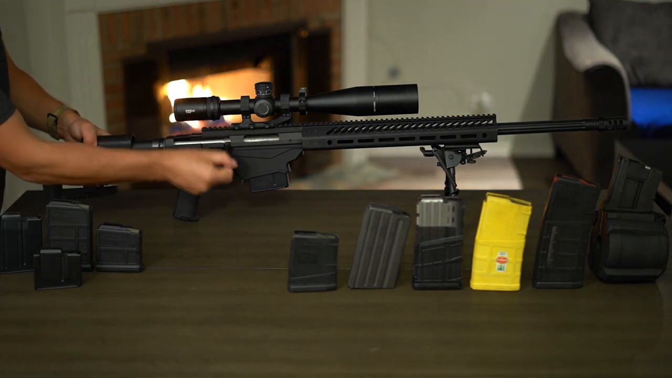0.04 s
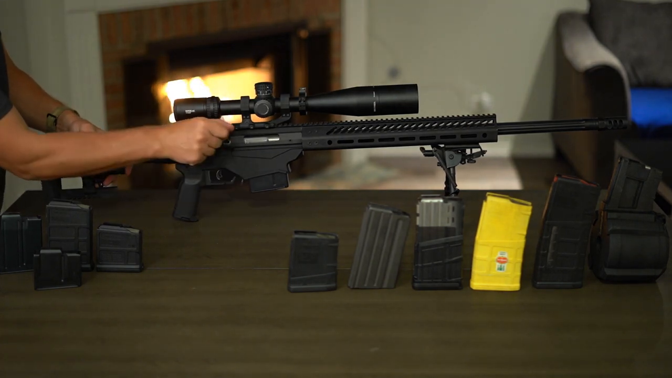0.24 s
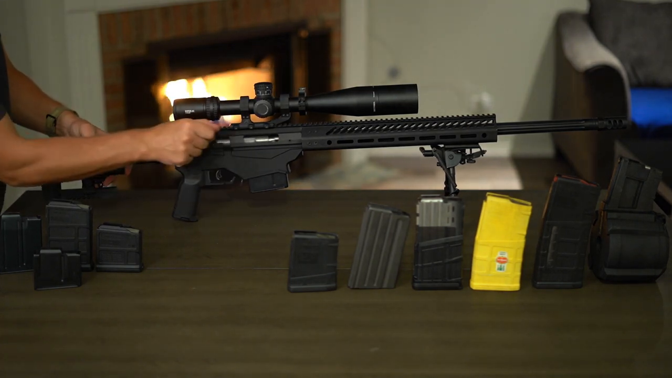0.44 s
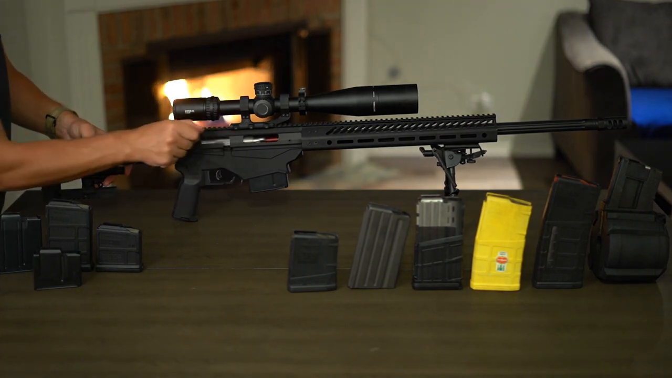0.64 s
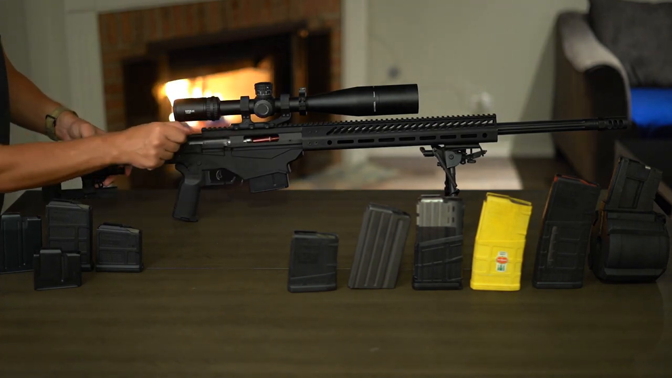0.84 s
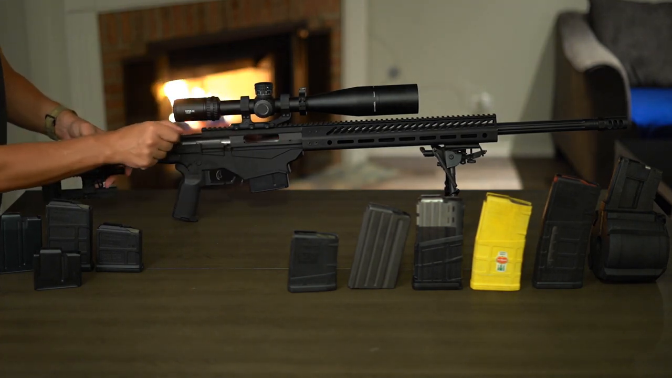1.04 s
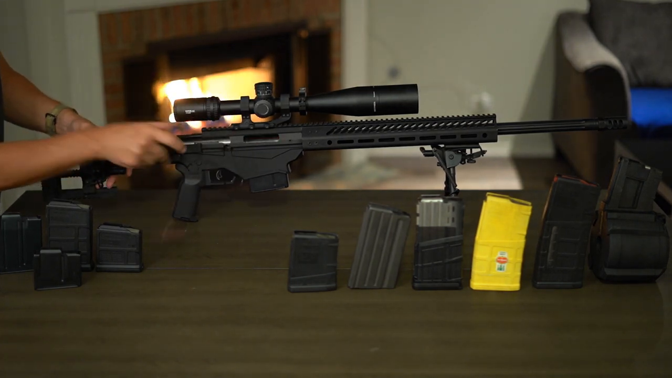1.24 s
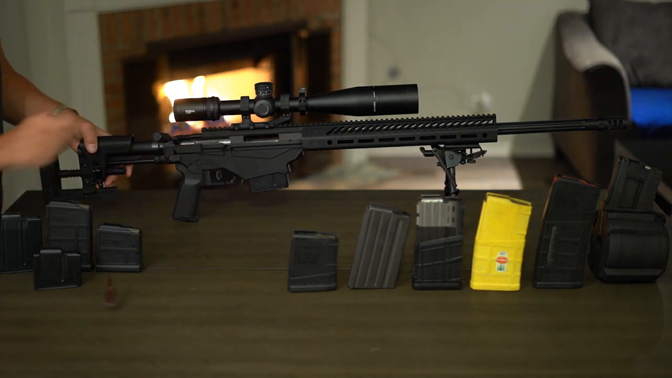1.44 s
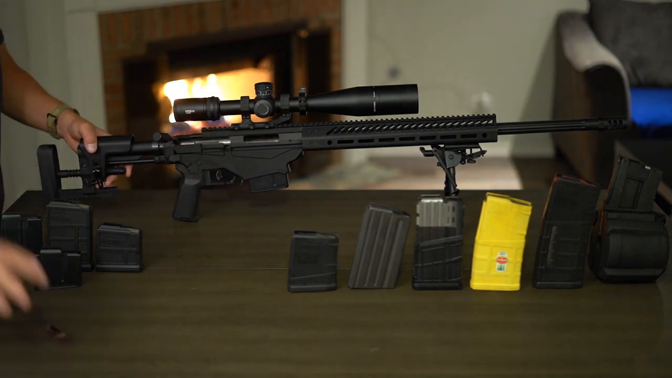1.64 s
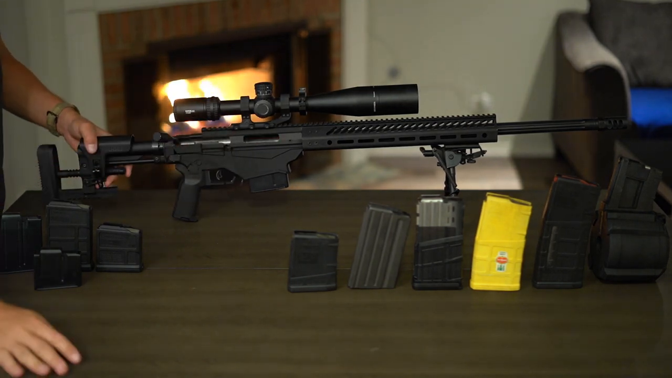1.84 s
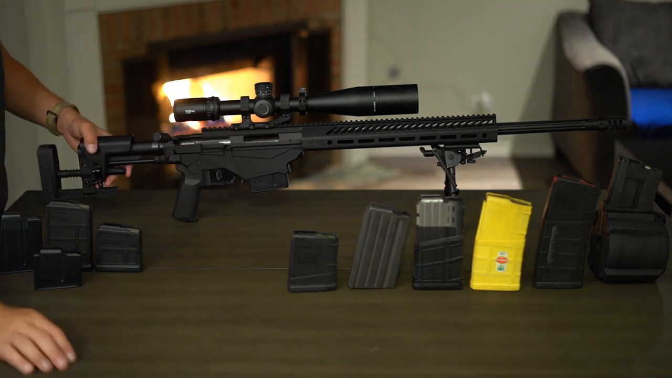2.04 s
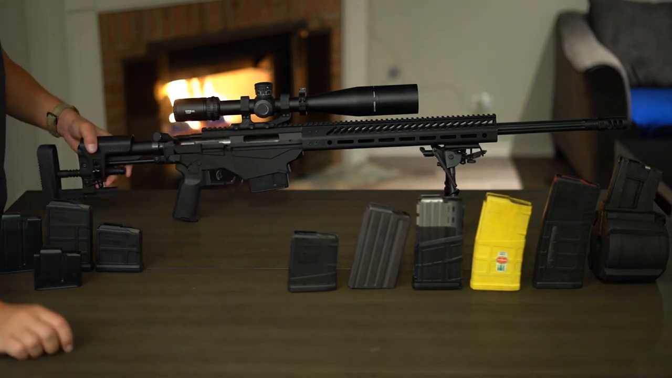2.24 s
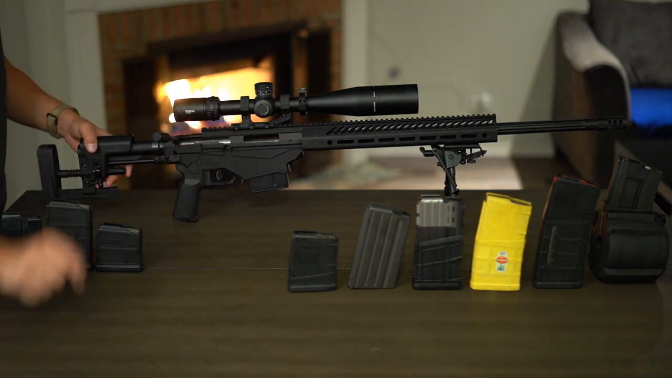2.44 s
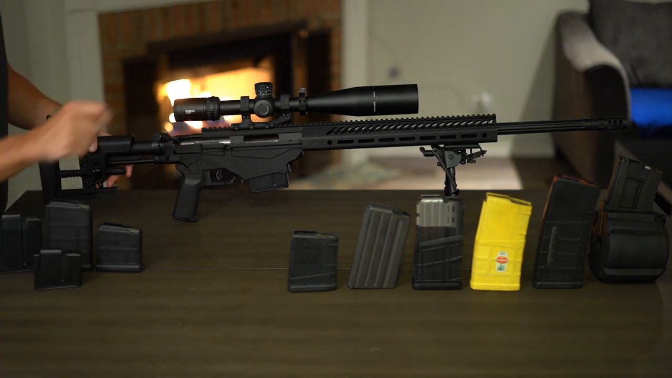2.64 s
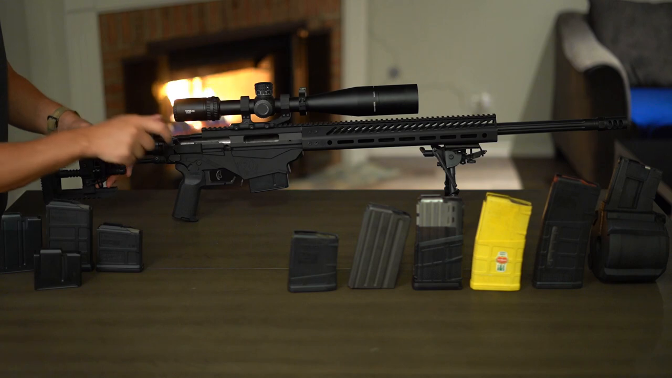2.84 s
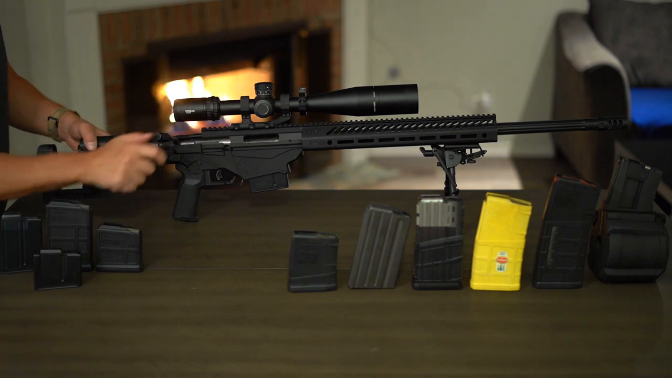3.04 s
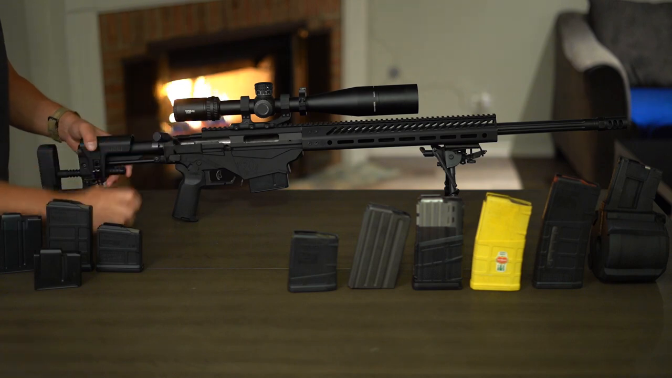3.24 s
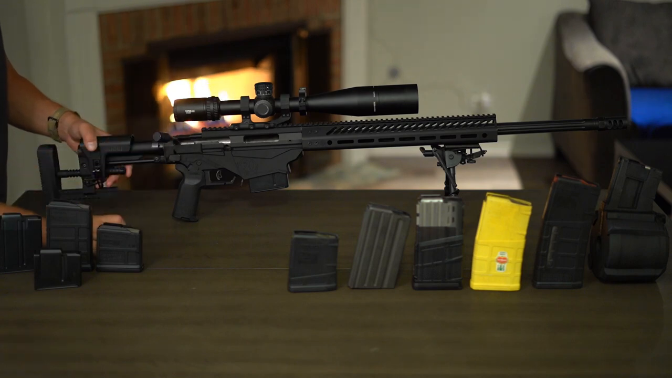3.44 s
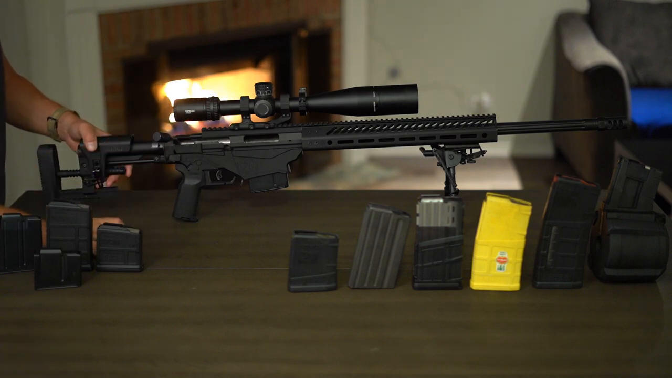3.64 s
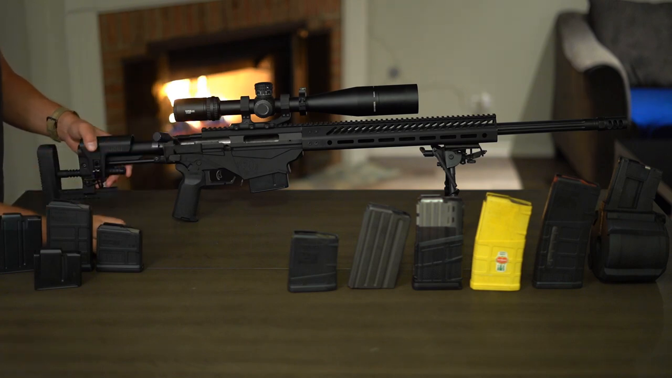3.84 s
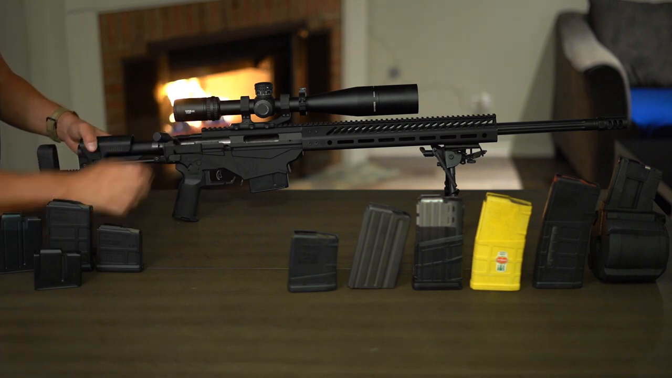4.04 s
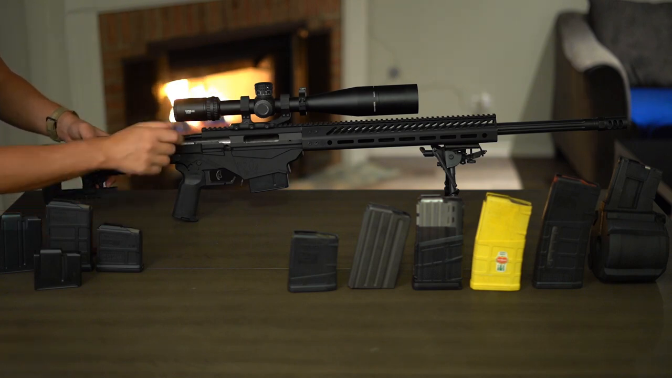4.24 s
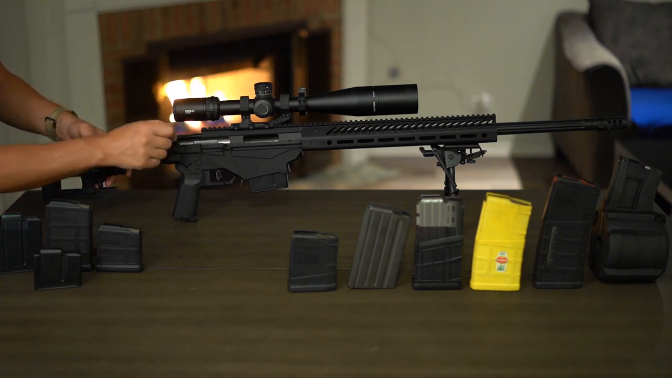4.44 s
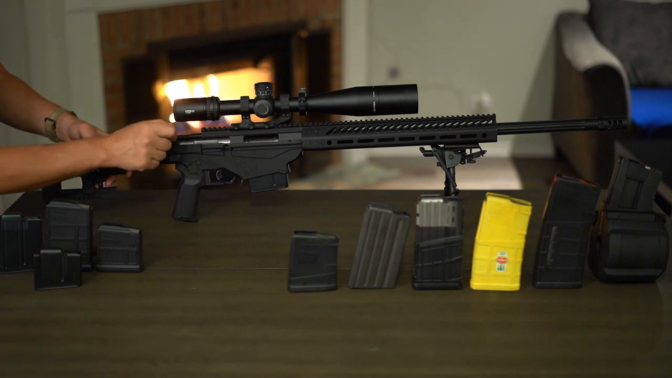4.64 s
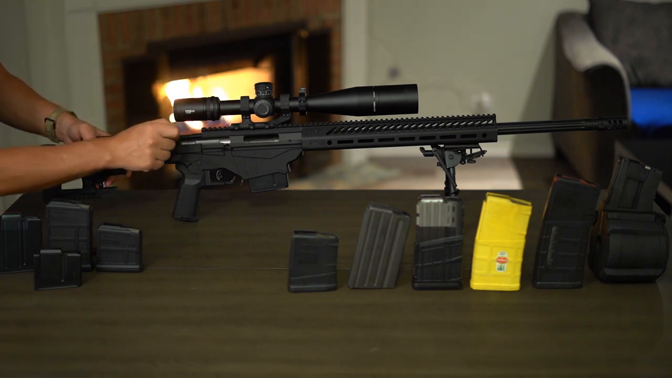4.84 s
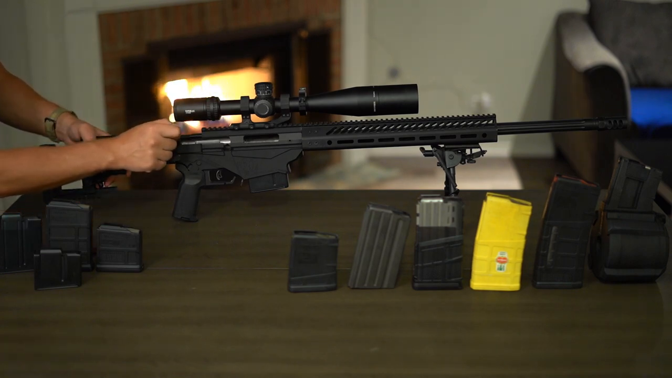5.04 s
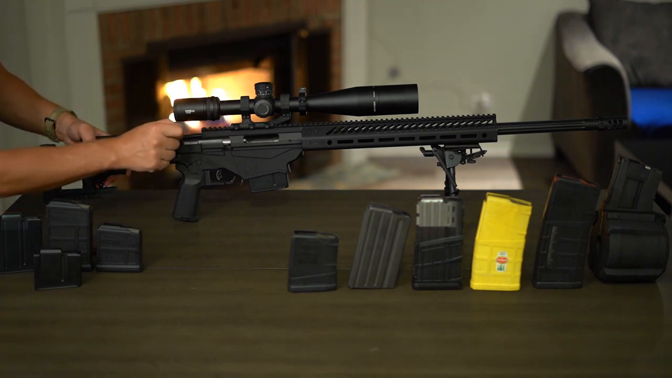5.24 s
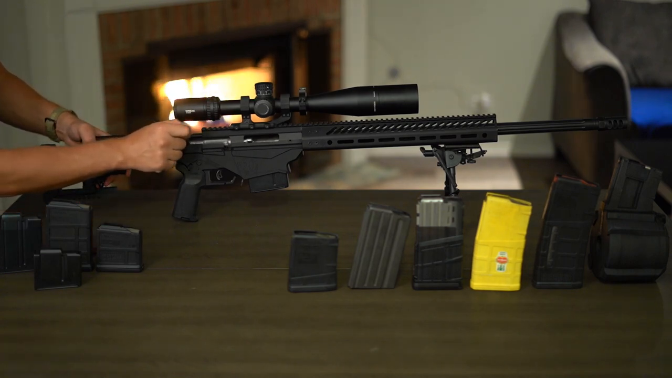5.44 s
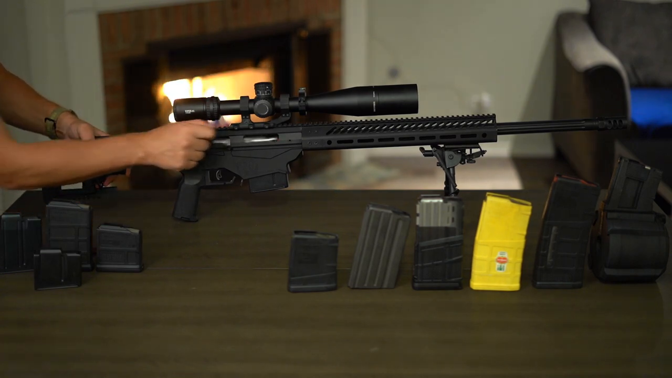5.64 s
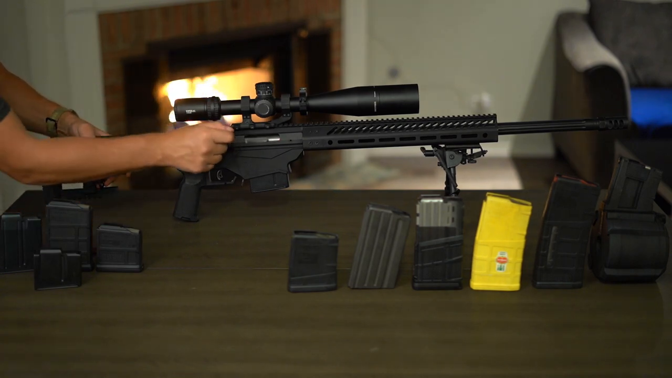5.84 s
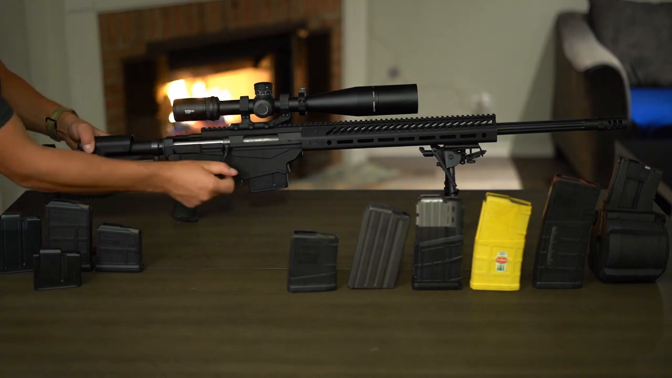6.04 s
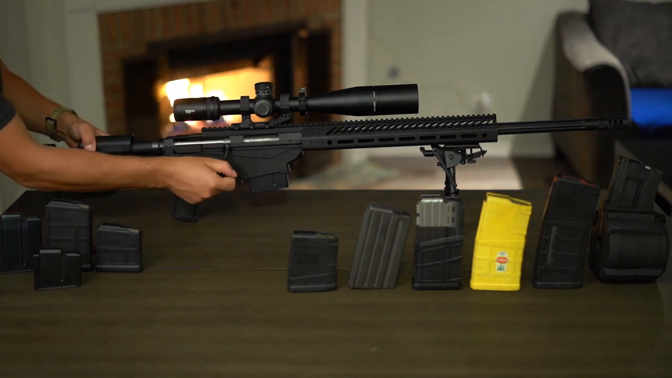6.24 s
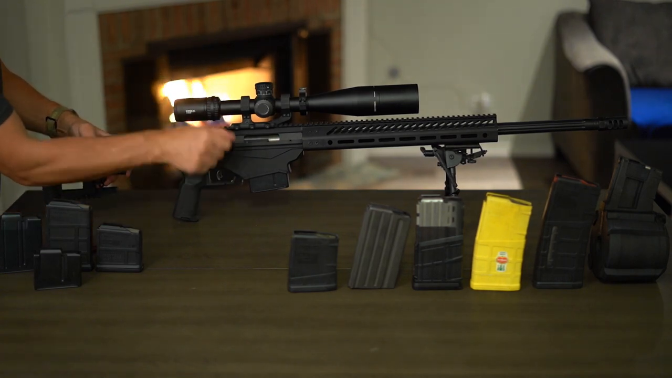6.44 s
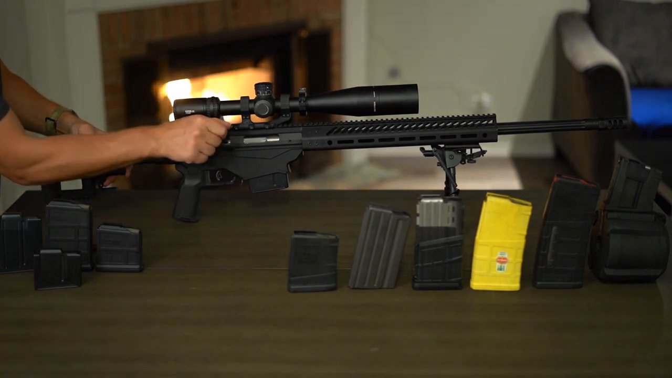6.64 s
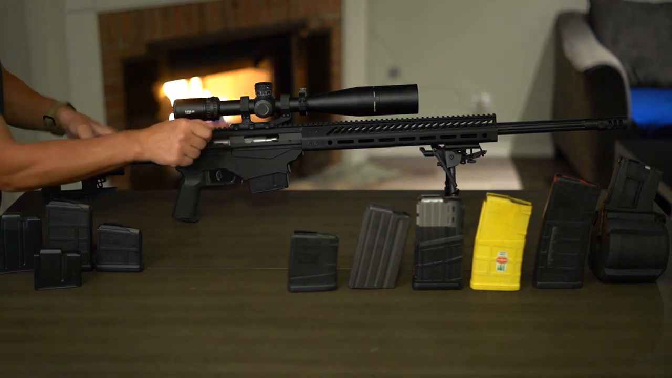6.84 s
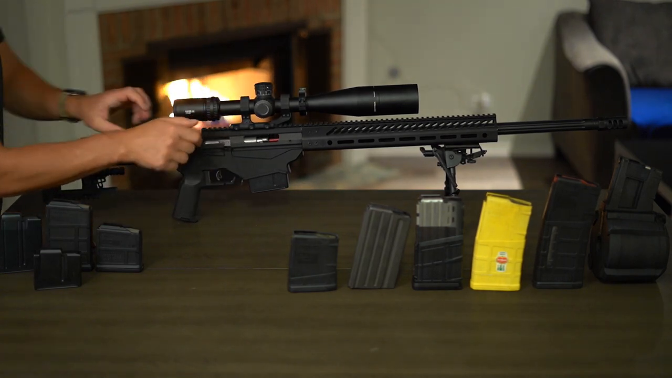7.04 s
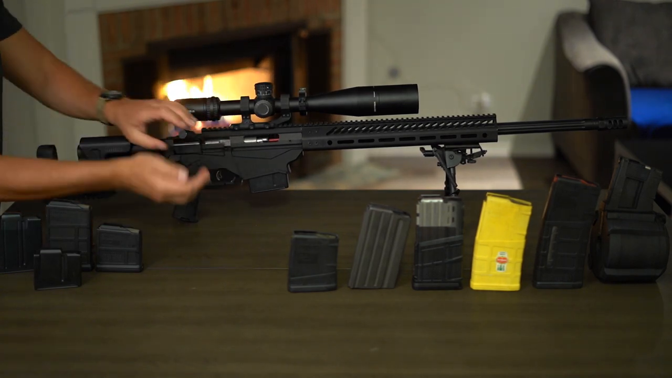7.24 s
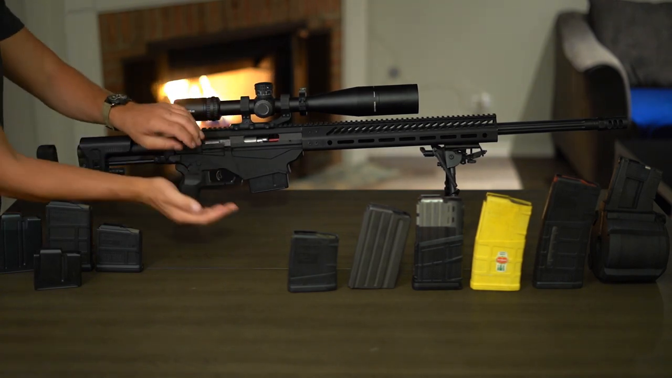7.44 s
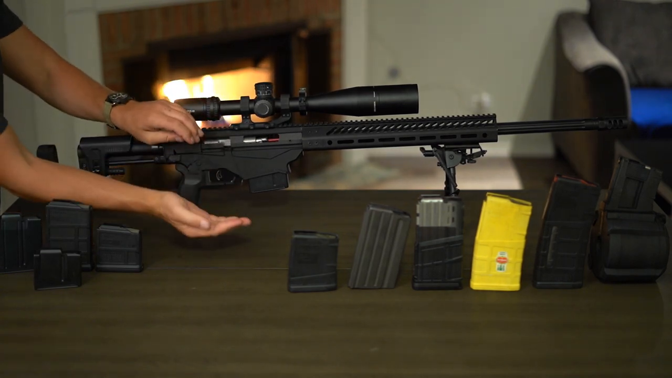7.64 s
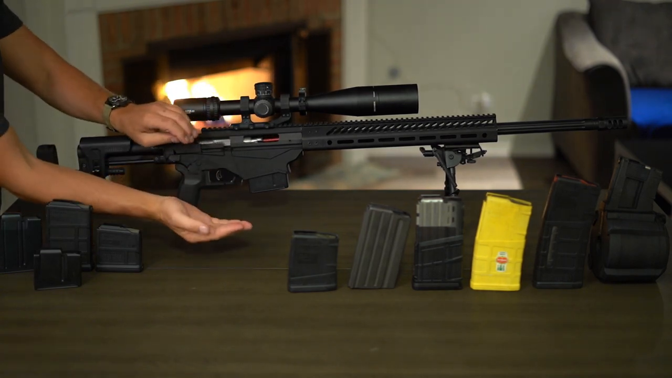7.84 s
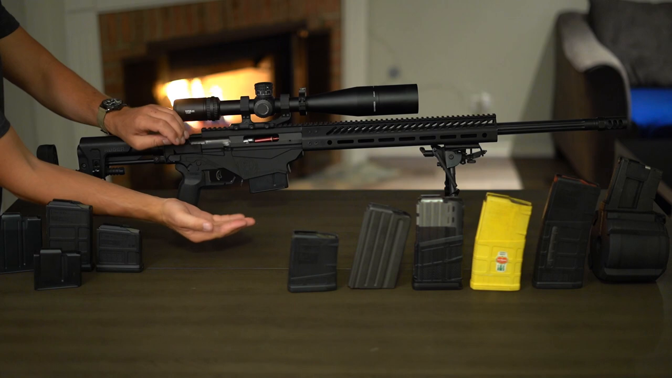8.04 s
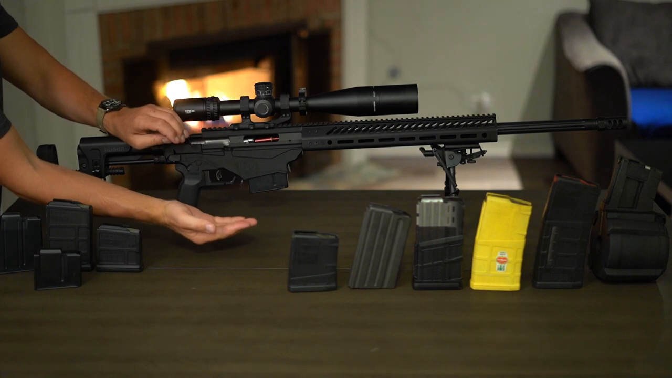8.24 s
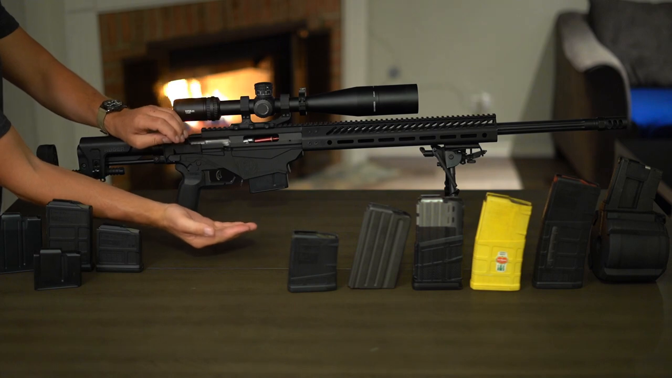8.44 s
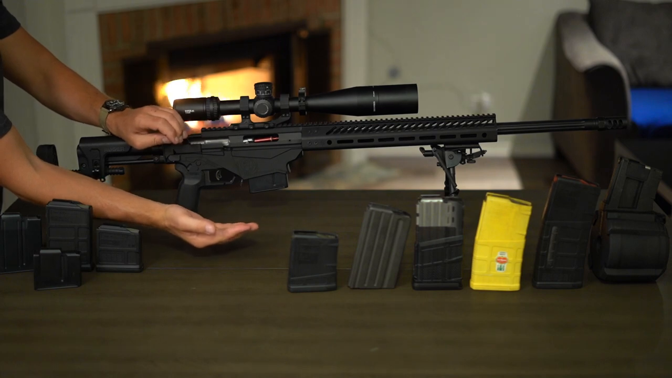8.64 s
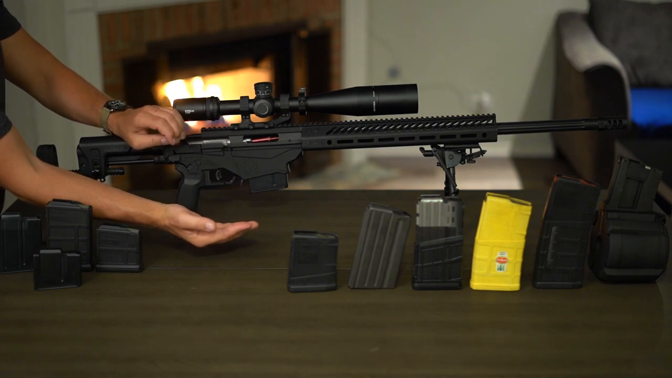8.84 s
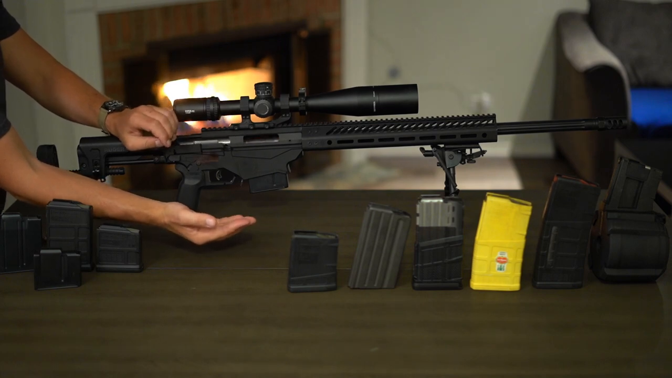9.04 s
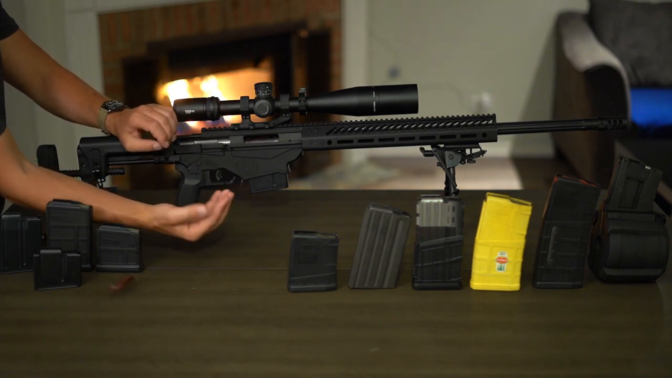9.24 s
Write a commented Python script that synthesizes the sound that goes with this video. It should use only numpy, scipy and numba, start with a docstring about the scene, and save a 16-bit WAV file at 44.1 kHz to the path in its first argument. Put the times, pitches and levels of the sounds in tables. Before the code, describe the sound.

A bolt-action rifle is worked twice on a table, near the microphone in a reverberant room with a low hum. Steel clacks and a short scrape send a ringing brass case clattering over the hard surface. One dry firing pin snap follows, then the bolt slams home and locks, thumping the table. It opens again amid soft handling knocks, and another case ejects with a high ping and a quick clack.

```python
"""A bolt-action rifle is cycled twice on a table, close to one microphone in an echoing living room.
Its steel bolt lifts, slides and slams, ringing the rifle and thumping the table; the firing pin snaps once.
Two ejected brass cases ring and tumble, and the first clatters on a hard surface.
A limiter squeezes the loudest blows. Under it all lies a low room rumble with a hum."""
import sys
import numpy as np
from scipy import signal
from scipy.fft import rfft, irfft, next_fast_len
from scipy.io import wavfile
from numba import njit

SR = 44100
rng = np.random.default_rng(int(sys.argv[2]) if len(sys.argv) > 2 else 0)


def store_wav(level_fs):
    """Save 16-bit WAV to argv[1]."""
    pcm = np.round(np.clip(np.atleast_2d(level_fs), -1, 1) * 32767)
    wavfile.write(sys.argv[1], SR, pcm.T.astype(np.int16))


N = 410571
SNAP_S = 4.3705  # when the firing pin snaps


def rifle_hits(knock_hz=1524, knock_room_db=0.5, pin_db=-10.5, pin_hz=2930, pin_room_db=-6):
    """Hits ring the rifle's steel: square ones are brighter than glancing ones, near-side ones drier."""
    # Four kinds of hit, each with the columns
    # (time [s], strength [dB], brightness [dB per octave], pitch of struck part [Hz], room share [dB])
    clacks = [(.161, -11.5, 0, 3560, 2), (.172, -7.5, 0, 3230, -14), (.184, -17, 2.5, 3390, 3),
              (.252, -10.5, 1, 3400, 2), (1.14, -12, 0, 2170, -1.5), (5.985, -16, -2.5, 3300, 6),
              (5.999, -1.5, 0.5, 3550, 2.5), (6.047, -7, 0.5, 4150, 4.5), (6.075, -9.5, -3.5, 790, -5),
              (6.454, -9, -1, 3460, 1), (6.465, -13, 1, 4130, -3), (6.555, -9, 1, 1495, 3.5),
              (6.93, -18.5, -4, 1980, -6)]  # the bolt handle lifts, drops and locks
    stops = [(.754, -9.5, 0, 4050, 0.496), (5.788, -8, 0, 4140, 0.82), (7.94, -11.5, 0, 5400, 3.5)]  # the bolt hits either end of its travel
    catches = [(1.056, -16.5, -1.8, 2454, -2.5), (1.083, -17, -4.3, 3960, -6),
               (4.889, -26, -2.8, 3350, -3.5), (5.591, -21.5, -0.5, 2770, 1.5), (5.63, 5, 2.4, 2700, 0),
               (5.676, -9.5, 0.34, 2760, 6), (8.951, -13, 0.12, 4300, 0.5), (8.983, -12, 1, 2980, -17),
               (9.017, -10, -0.46, 2210, 1)]  # bolt face, extractor and ejector catch a cartridge
    clinks = [(1.09, -17.5, 0.5, 3570, -1.5), (1.353, -2, 7, 3500, -17.5), (1.361, -8, 4, 3500, -12),
              (5.708, -12, -1, 3370, 4.5), (8.995, -20.5, -2, 3800, 6)]  # the mouth of a case strikes something hard
    # hands and loose parts knock the rifle: (time [s], strength [dB], brightness [dB per octave])
    knocks = [(.084, -36.5, 2), (.229, -14.5, 1.5), (.449, -24.5, 6.5), (0.609, -33, 12),
              (1.257, -25.5, -0.5), (5.055, -42.5, 5), (5.115, -32.5, -1), (6.437, -31.5, 2),
              (6.507, -23, 4), (6.753, -30, 9), (6.81, -25.5, -2), (6.945, -22, 6.5), (7.067, -30, -1.5),
              (7.492, -27.5, -1), (7.634, -23, 0), (7.788, -31, 0), (8.494, -36.5, -2.5)]
    # the tone of each kind of hit: (level [dB]) at each of the six bass-to-treble points in blows()
    clack_colour = [-8.5, -8, 0, -1, -10, -23]
    stop_colour = [-11, -11, -2, -1, -4, -8.5]
    catch_colour = [-25, -18, -8, -3, -19, -24.5]
    clink_colour = [-4.5, -4, -1, -5.5, 11.5, -3.5]
    knock_colour = [3.5, 6, 6, 0.5, -19, -34.5]
    snap_colour = [-4.5, 3, 1.5, -1.5, -9.5, -27]
    # peaks and dips in the rifle's ring: (pitch [Hz], width [Hz], boost [dB])
    resonances = [(457, 140, 10.5), (790, 240, 3), (1474, 44.5, -1), (2830, 202, 1), (3200, 480, 2),
                  (4160, 2500, 4.5), (5270, 430, 1.5), (6260, 160, 3), (7620, 50, -3.5), (7700, 210, 3.5),
                  (9340, 250, 3.5), (10200, 155, 3.5), (14170, 213, -5)]
    kinds = [(clacks, clack_colour), (stops, stop_colour),
             (catches, catch_colour), (clinks, clink_colour),
             ([(*row, knock_hz, knock_room_db) for row in knocks], knock_colour),
             ([(SNAP_S, pin_db, 0, pin_hz, pin_room_db)], snap_colour)]
    return sum(blows(hits, colour, resonances, contact_s=0.0056, part_share=0.72, part_width=0.086,
                     extra_room_db=-0.1, ripple_db=2.5) for hits, colour in kinds)


def bolt_slides(swell_db=16, grain_db=4, catches_per_s=260, treble_hz=5000):
    """Steel catches and slips on steel; pressing a cartridge along makes it brighter."""
    # strokes of the bolt: (hardest push [s], swell [s], let-off [s], level [dB], treble share [dB])
    strokes = [(.72, 0.24, 0.057, -33, -5.5), (5.41, .14, 0.021, -37, -7), (5.585, 0.12, 0.051, -29.5, -4),
               (5.71, 0.091, 0.11, -10, 4.5), (6.07, .06, 0.039, -24.5, -23), (7.91, .08, 0.065, -36.5, -9),
               (8.92, 0.076, .05, -38, -20), (8.965, 0.016, 0.026, -27.5, -14)]
    # the tone of the scraping: (frequency [Hz], relative level [dB])
    scrape_colour = [(200, -5.5), (450, -3), (1200, -5.5), (2200, -4.5), (2750, 1), (3050, -4.5),
                     (3500, 1.5), (4800, -10), (7500, -13.5), (11000, -22), (16000, -26)]
    # dry steel squeaks as it slides: (time [s], level [dB], pitch [Hz], length [s])
    squeaks = [(0.59, -36, 4660, 0.044), (0.641, -26.5, 1240, 0.018), (0.676, -30, 2780, 0.014),
               (.722, -31.5, 2880, 0.039), (5.402, -37, 2720, 0.024)]
    out = np.zeros(N)
    for s, swell, let_off, db, treble_db in strokes:
        t = np.arange(-swell, let_off, 1 / SR)
        push_db = db - swell_db * np.maximum(-t / swell, t / let_off)
        rub = shaped(rng.standard_normal(SR)[:len(t)], scrape_colour)
        rub *= amp(grain_db * drift(t + swell, catches_per_s))
        dull = signal.sosfilt(signal.butter(4, treble_hz, fs=SR, output="sos"), rub)
        bright = signal.sosfilt(signal.butter(4, treble_hz, "high", fs=SR, output="sos"), rub)
        add(out, s - swell, amp(push_db) * unit(dull + amp(treble_db) * bright))
    for s, db, hz, length in squeaks:
        t = np.arange(0, length, 1 / SR)
        cycles = np.cumsum(hz * (1 + 0.029 * drift(t, 378))) / SR
        add(out, s, amp(db) * np.sqrt(2) * np.sin(2 * np.pi * cycles) * np.hanning(len(t)))
    return out


def thumps(snap_db=-16.5):
    """The firing pin shakes the rifle's frame; pushing the bolt shakes the table through the rifle."""
    # pushes on the bolt: (time [s], strength [dB])
    pushes = [(.253, -34.5), (5.632, -24), (5.788, -26.5), (6.076, -26), (8.984, -38)]
    # natural tones of frame and table: (pitch [Hz], relative level [dB], time to fade 60 dB [s])
    frame_tones = [(322, -22, .14), (443, 1.5, 0.11), (770, -1.5, 0.094), (910, -6, 0.13),
                   (1007, -3.5, 0.08), (2840, 0, 0.0087)]
    table_tones = [(136, 5, .3), (165, 2, 0.26), (244.2, -5, 0.3), (302.4, 5.5, .25)]
    t, out = np.arange(SR // 2) / SR, np.zeros(N)
    for hits, tones in [([(SNAP_S, snap_db)], frame_tones), (pushes, table_tones)]:
        ring = sum(amp(db - 60 * t / fade_s) * np.sin(2 * np.pi * hz * t) for hz, db, fade_s in tones)
        for s, db in hits:
            add(out, s, amp(db) * ring)
    return out


def ringing_cases(split_hz=38, partner_db=-5, depth=0.61, swing=0.97, wobble=0.83):
    """A brass case's mouth rings with two close tones; tumbling swings their loudness and phase."""
    # each ring of a case: (time [s], level [dB], pitch [Hz], time to fade 60 dB [s],
    # tumbles [per s], time until it lies still [s])
    rings = [(1.089, -9.5, 10030, 0.77, 39.5, 0.31), (1.349, -1, 9990, 0.67, 9.3, 0.53),
             (1.862, -20, 10130, 0.046, 14, .05), (2.182, -24, 10050, 0.067, 14, .15),
             (3.509, -58, 10010, 0.29, 16, .15), (3.663, -47, 9650, 0.38, 14.4, 0.18),
             (5.640, -2.5, 10300, 0.28, 41, 0.099), (8.996, -2.5, 10240, 0.53, 30, 0.22)]
    t, out = np.arange(SR) / SR, np.zeros(N)
    for s, db, hz, fade_s, tumbles, still_s in rings:
        turn = 2 * np.pi * tumbles * t + drift(t, 13.56)
        phase = 2 * np.pi * hz * t + swing * np.sin(turn) + wobble * drift(t, 4 * tumbles)
        beat = np.pi * split_hz * t
        pair = np.sin(phase + beat / 2) + amp(partner_db) * np.sin(phase - 3 * beat / 2)
        damping = np.exp(-np.maximum(t - still_s, 0) / 0.027)
        add(out, s, amp(db - 60 * t / fade_s) * damping * pair * (1 - depth * np.sin(turn) ** 2))
    return out


def falling_brass(room_db=1):
    """Brass lands on a hard surface, bounces and is set down."""
    # landings: (time [s], strength [dB], brightness [dB per octave], pitch of struck part [Hz])
    drops = [(1.34, -6.5, -1.5, 2040), (1.349, 10.5, 2, 2650), (1.5, -3.5, 2, 1970), (1.592, -6, 0, 4100),
             (2.128, -8, 3.5, 1530), (2.176, -9.5, -1, 1460), (3.509, -24.5, -1, 2000),
             (3.66, -12.5, -4.5, 1510), (3.67, -13, -1.5, 1390), (3.8, -26.5, -3, 1560),
             (9.294, 1, 2.5, 3380), (9.304, -2, 3, 1120)]
    # the tone of a landing: (level [dB]) at each of the six bass-to-treble points in blows()
    colour = [-20.5, -2, 7, 1.5, -22, -36]
    # peaks in the ring of brass on the surface: (pitch [Hz], width [Hz], boost [dB])
    resonances = [(400, 230, 6.3), (694, 51, 6.1), (1240, 170, 2.9), (1500, 40, 5), (1980, 33, 1.7),
                  (3180, 75, 0.73), (3680, 530, 4.7), (10130, 310, 14)]
    hits = [(*row, room_db) for row in [*drops, *rattle(), *settling()]]
    return blows(hits, colour, resonances, contact_s=0.0085, part_share=0.37, part_width=0.15,
                 extra_room_db=1.15, ripple_db=3.0)


def rattle(count=11, start_s=1.375, end_s=1.65, first_db=-9, loss_db=3, spread_db=3):
    """Lists the nicks of the spinning case between its first bounces, growing softer and duller."""
    when, size, pitch = rng.random((count, 3)).T
    progress = (np.arange(count) + when) / count
    db = first_db - loss_db * progress + spread_db * (2 * size - 1)
    brightness = 3 - 2 * progress
    return list(zip(start_s + (end_s - start_s) * progress, db, brightness, 1000 * 4.6 ** pitch))


def settling(count=8, start_s=1.69, flight_s=0.056, share=0.715, first_db=-3.5, loss_db=2.18):
    """Lists the first case's last, ever softer bounces; each flight lasts a share of the one before."""
    bounce = np.arange(count)
    times = start_s + flight_s * (1 - share ** bounce) / (1 - share)
    brightness = np.full(count, -0.22)
    part_hz = 1100 * 3.7 ** rng.random(count)  # each lands on another spot
    return list(zip(times, first_db - loss_db * bounce, brightness, part_hz))


def blows(hits, colour, resonances, contact_s, part_share, part_width, extra_room_db, ripple_db):
    """Each hit rings a hard body and echoes in the room; its kind and its spot set the tone."""
    # the six points at which a colour gives its levels: (frequency [Hz])
    colour_hz = [120, 550, 1500, 3500, 7200, 13000]
    # tones of the struck part: (multiple of its pitch, boost [dB] before scaling by part_share)
    overtones = [(1, 12), (1.33, 2.5), (1.86, 1.5)]
    # echoes from near walls: (delay [s], level [dB] before the hit's room share is added)
    echoes = [(0.0094, -14), (0.0126, -22.5), (.0165, -25.5), (.0215, -31), (.0235, -23.5)]
    hz = np.fft.rfftfreq(4096, 1 / SR)
    body_db = sum(db / (1 + (2 * (hz - pitch) / width) ** 2) for pitch, width, db in resonances)
    # countless weak resonances ripple the tone, wider apart in the treble
    body_db += ripple_db * drift(np.sqrt(hz), 2.2)
    octaves = np.log2(np.maximum(hz, colour_hz[1]) / 3500)  # brightness tilts the tone around 3500 Hz
    # small parts beam their treble at the microphone; their bass arrives by way of the room
    bass_cut = signal.butter(1, 650, "high", fs=SR)
    out = np.zeros(N)
    for s, db, brightness, part_hz, room_db in hits:
        colour_db = curve(list(zip(colour_hz, colour)), hz) + brightness * octaves
        part_db = part_share * sum(boost / (1 + (2 * (hz / (k * part_hz) - 1) / part_width) ** 2)
                                   for k, boost in overtones)
        part_db += 2.1 * drift(np.log(hz + 1), 16)  # each spot favours other tones
        strike = contact(contact_s)
        paths = amp(room_db + extra_room_db) * room_tail()
        add(paths, 0, signal.lfilter(*bass_cut, strike))
        for delay, echo_db in echoes:
            add(paths, delay, amp(echo_db + room_db) * strike)
        ring = shortest_ring(colour_db + body_db + part_db)
        add(out, s, amp(db) * np.sqrt(0.007 * SR) * signal.fftconvolve(paths, ring))
    return out


def contact(length_s):
    """Hard parts chatter for a few milliseconds, about equally at all frequencies; energy 1."""
    t = np.arange(1024) / SR
    fade = np.exp(-(t / length_s) ** 2)
    phases = np.angle(rfft(rng.standard_normal(len(t)) * fade))
    chatter = irfft(np.exp(1j * phases)) * np.sqrt(fade)
    return chatter / np.linalg.norm(chatter)


def shortest_ring(gain_db):
    """The shortest ring that has this spectrum (minimum phase); energy 1."""
    log_gain = np.log(amp(np.r_[gain_db, gain_db[-2:0:-1]]))
    ring = np.fft.ifft(np.exp(np.conj(signal.hilbert(log_gain)))).real
    return ring / np.linalg.norm(ring)


def room_tail(onset_s=0.0064):
    """A blur of room echoes builds up and dies, each band fading at its own speed; energy 1."""
    # how long the room rings: (frequency [Hz], time to fade 60 dB [s])
    fade_times = [(200, 0.6), (530, 0.56), (1400, .6), (3700, 0.58), (9700, 0.46), (15000, 0.31)]
    # the room's tone: (frequency [Hz], relative level [dB])
    colour = [(150, 7.5), (500, 4.5), (1500, 2.5), (3500, 1.5), (8000, 4), (15000, 4.5)]
    hz, t, bands = signal.stft(rng.standard_normal(SR * 2 // 3), SR, nperseg=256)
    fade_db = curve(colour, hz)[:, None] - 60 * t / curve(fade_times, hz)[:, None]
    sound = signal.istft(bands * amp(fade_db), SR, nperseg=256)[1]
    sound *= 1 - np.exp(-(np.arange(len(sound)) / SR / onset_s) ** 2)
    return sound / np.linalg.norm(sound)


def background(rumble_db=-33, hum_hz=100.4, hum_db=-40, waver=0.5):
    """Low room rumble with a wavering hum."""
    # the rumble's tone: (frequency [Hz], relative level [dB])
    colour = [(20, -29.5), (45, -20.5), (62, -4.5), (100, -4), (150, -9), (240, -12.5), (480, -18.5),
              (700, -23), (1500, -28), (2400, -36.5), (3900, -35.5), (5200, -44.5), (8000, -51.5),
              (15000, -62.5)]
    t = np.arange(N) / SR
    hum = np.sin(2 * np.pi * hum_hz * t + drift(t, 6)) * (1 + waver * drift(t, 6))
    return amp(rumble_db) * shaped(rng.standard_normal(N), colour) + amp(hum_db) * unit(hum)


def amp(db):
    """Turns decibels into a gain."""
    return 10 ** (np.asarray(db) / 20)


def unit(x):
    """Scales a sound to an average (rms) level of 1."""
    return x / np.sqrt(np.mean(x ** 2) + 1e-20)


def curve(points, hz):
    """Joins (frequency [Hz], value) points on a log-frequency axis."""
    point_hz, values = np.transpose(points)
    return np.interp(np.log(hz + 1), np.log(point_hz + 1), values)


def add(mix, s, sound):
    """Mixes a sound in, starting at s seconds."""
    part = mix[round(s * SR):][:len(sound)]
    part += sound[:len(part)]


def shaped(x, colour):
    """Filters x with a smooth tone curve, then scales it to rms 1."""
    size = next_fast_len(len(x))
    gain = amp(curve(colour, np.fft.rfftfreq(size, 1 / SR)))
    return unit(irfft(rfft(x, size) * gain, size)[:len(x)])


def drift(t, rate):
    """Glides between random values, rate of them per unit of t."""
    knots = np.arange(1024) / rate
    return np.interp(t, knots, rng.standard_normal(len(knots)))


def scene():
    """The rifle is near the microphone; the falling brass is farther off."""
    rifle, landings = rifle_hits(), falling_brass()  # these carry their own room echoes
    thuds, rubbing, brass = thumps(), bolt_slides(), ringing_cases()
    into_room = amp(-2) * rubbing + amp(-5.5) * brass + amp(-6) * thuds
    walls = signal.fftconvolve(into_room, room_tail())[:N]
    return (rifle + landings + thuds + rubbing + brass + walls + background())[None]


@njit
def limiter_cut(over_db, release):
    """The cut in dB jumps up with the excess level and lets go slowly."""
    out, held = np.zeros(len(over_db)), 0.
    for i in range(len(over_db)):
        held = max(over_db[i], held * (1 - release))
        out[i] = held
    return out


def record(dry, ceiling_db=-9.0, attack_s=0.0054, release_s=0.15, top_hz=15850):
    """A limiter turns loud blows down, too late for the first peaks, which clip; the top treble is cut."""
    memory = np.exp(-1 / (attack_s * SR))
    power = signal.lfilter([1 - memory], [1, -memory], dry[0] ** 2)
    over_db = np.maximum(10 * np.log10(power + 1e-12) - ceiling_db, 0)
    cut_db = limiter_cut(over_db, 1 / (release_s * SR))
    limited = np.clip(dry * amp(-cut_db), -1, 1)
    lowpass = signal.firwin(511, top_hz, window=("kaiser", 9), fs=SR)
    return signal.oaconvolve(limited, lowpass[None], "same")


dry = scene()
out = record(dry)
store_wav(out)
```